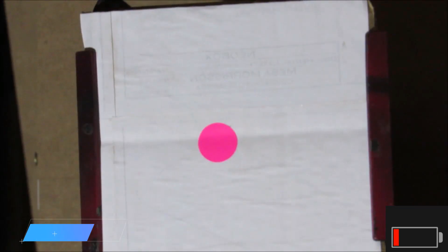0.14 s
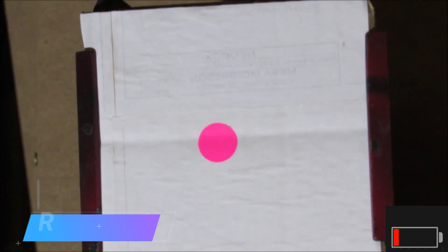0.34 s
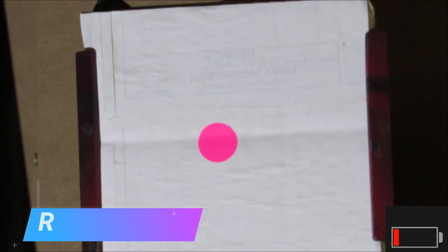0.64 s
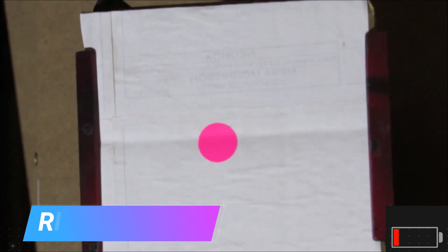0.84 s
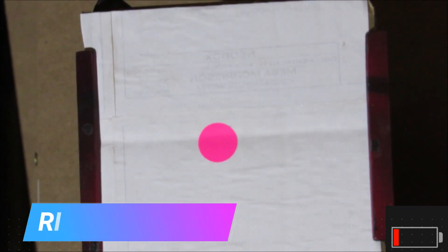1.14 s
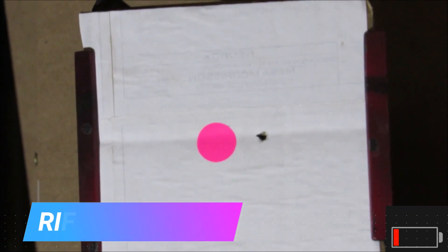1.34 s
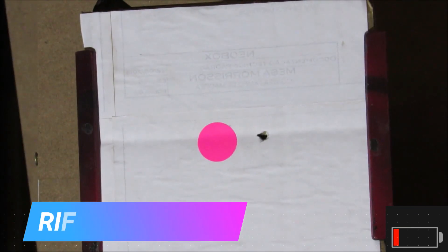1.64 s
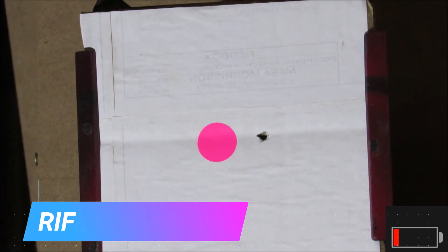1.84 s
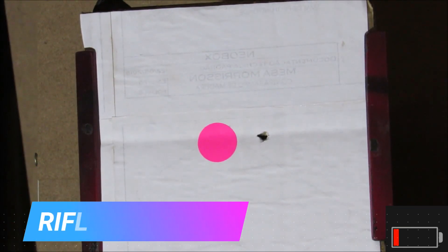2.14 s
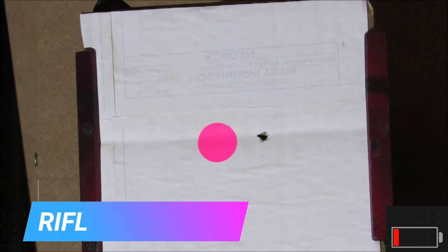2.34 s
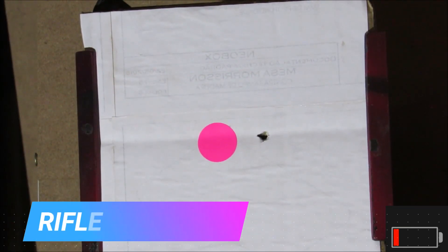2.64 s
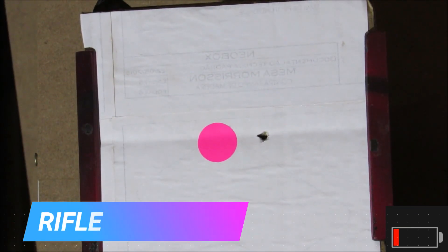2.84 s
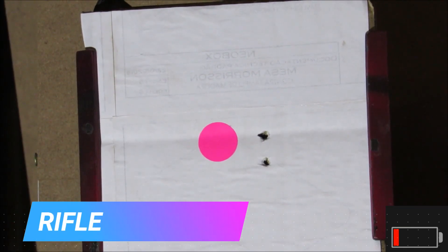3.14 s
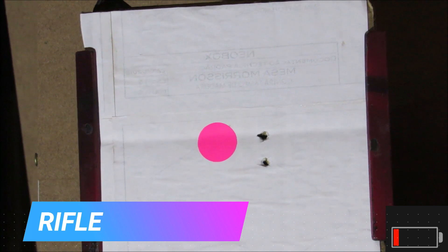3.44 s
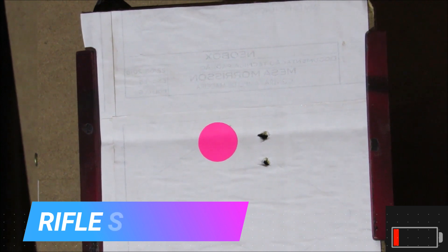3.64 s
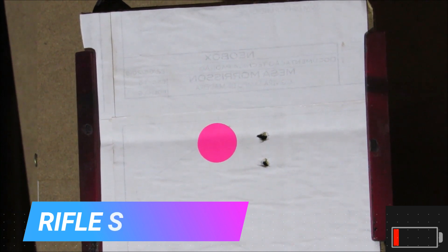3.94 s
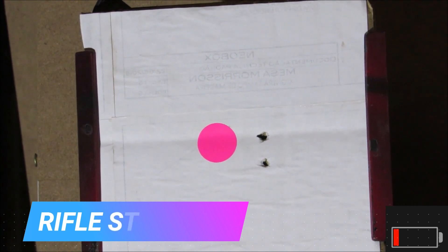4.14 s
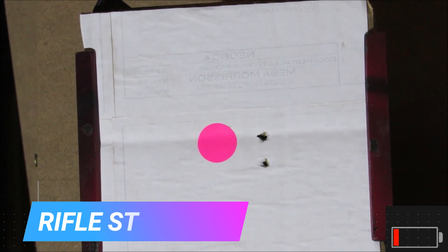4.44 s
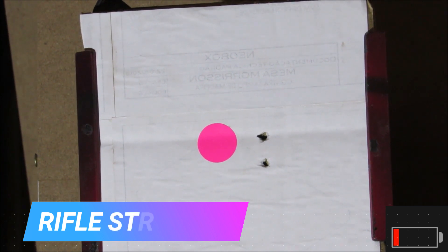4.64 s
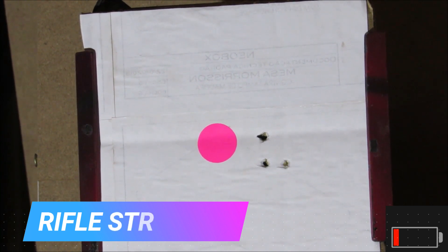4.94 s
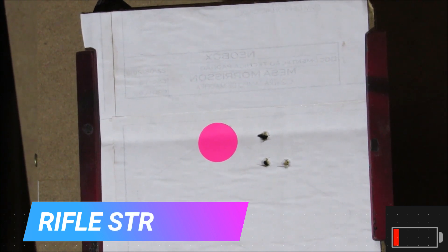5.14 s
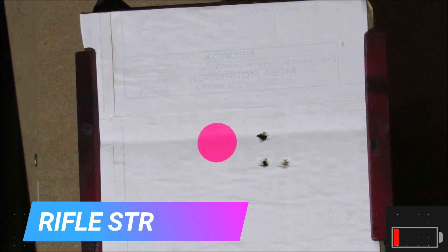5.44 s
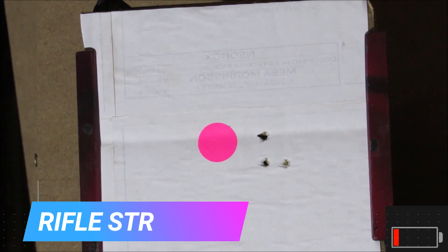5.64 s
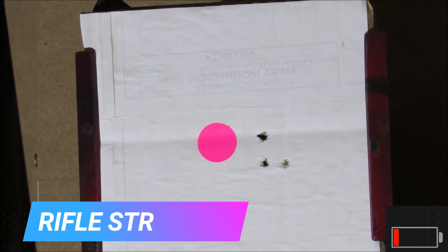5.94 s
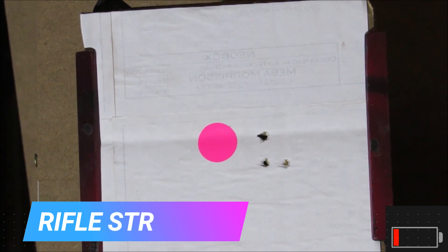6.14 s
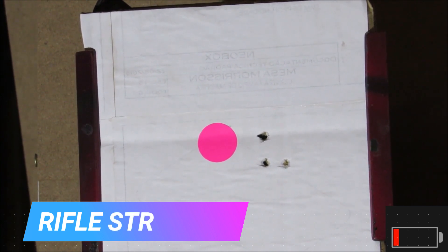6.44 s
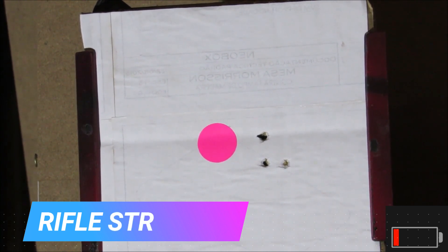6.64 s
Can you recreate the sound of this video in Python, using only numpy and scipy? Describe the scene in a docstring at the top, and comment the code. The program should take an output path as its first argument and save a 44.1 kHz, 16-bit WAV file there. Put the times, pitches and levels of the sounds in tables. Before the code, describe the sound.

Heard in stereo from beside the target in an indoor range, three air rifle shots land at a steady pace. Each is a distant pop, a split-second hiss of the passing pellet and a loud crack through card, with a ringing steel tail and an echo. The low ventilation hum drops away at every shot and then returns. Two quick ticks come between the last shots, and near the end the rifle knocks softly far away.

```python
"""Ventilation rumbles and hums in a long, echoing range; a stereo pair stands beside the paper target.
Three air rifle shots come from the far end. Each time the muzzle pop arrives first, then the pellet
rushes past the microphones, punches the card and rings the steel trap. The background level ducks at
each shot, creeps up, then jumps back, the last time with a faint click. Two small ticks follow the
second shot; after the third, the rifle is handled far away."""
import sys
import numpy as np
from scipy import signal
from scipy.fft import rfft, irfft, next_fast_len
from scipy.io import wavfile
from scipy.ndimage import map_coordinates

SR = 44100
rng = np.random.default_rng(int(sys.argv[2]) if len(sys.argv) > 2 else 0)


def inscribe(sig):
    """Save sig as 16-bit PCM at rate SR to the path in sys.argv[1].

    A 1-D sig is mono; a 2-D sig holds one channel per row.
    Samples are clipped to [-1, 1] before scaling.
    """
    pcm = np.round(np.clip(np.atleast_2d(sig).T, -1, 1) * 32767)
    wavfile.write(sys.argv[1], SR, pcm.astype(np.int16))


N = 299880
T = np.arange(2 * SR) / SR  # seconds since an event
PASS_S = .0115  # the pellet passes the microphones this long before it meets the card

# shots at the target end: pop t/s, lag to card/s, card/dB, smack/dB, top trap modes/dB, ping f/Hz, ping/dB
SHOTS = [(1.2147, .0648, -11, -7, 0.5, 13000, -30), (2.8757, 0.064, -10, -16.5, -10.5, 8650, -22),
         (4.9050, .0602, -10, -9.5, -11.5, 8620, -22.5)]
# the pop's ways to the microphones (direct, off the floor, off a wall): delay/s, level/dB
POP_PATHS = [(0, -4), (.00128, 1), (.008, -6)]
# spectra of the far pop and of its wash of reflections: f/Hz, level/dB
POP_SPECTRUM = [(200, -32.5), (900, -22.5), (1500, -7.5), (2500, -14), (5000, -3.5), (7500, 0.5),
                (11000, -6.5), (15500, -24)]
WASH_SPECTRUM = [(180, -35), (300, -14.5), (485, -10), (643, -13.5), (853, -1.5), (1380, -2.5),
                 (2720, -8.5), (5840, -3.5), (9930, -5.5), (15800, -18.5)]
def muzzle(pop_db=2.0, spit_db=-18, wash_db=-25.5, wash_t60=3.0, hush_db=-9, late_t60=0.53):
    """From the far end, a sharp pop by three paths, then reflections that sink as the pellet passes."""
    out, t = np.zeros((2, N)), T[:SR // 4]
    floor_delay = POP_PATHS[1][0]
    for s, lag, *_ in SHOTS:
        for delay, path_db in POP_PATHS:
            add(out, s + delay, -amp(pop_db + path_db) * click(POP_SPECTRUM))
        add(out, s + floor_delay, amp(spit_db) * burst(POP_SPECTRUM, rise=0.00023, t60=0.009))
        since_pass = np.maximum(t - (lag - PASS_S), 0)
        sink_db = hush_db * np.minimum(since_pass / 0.0096, 1) - 60 * since_pass / late_t60
        envelope = amp(wash_db + sink_db - 60 * t / wash_t60) * np.minimum(t / 0.0074, 1)
        add(out, s, envelope * noise(WASH_SPECTRUM, len(t), NEAR_LIKENESS))
    return out


# spectrum of the pellet's rush, close by: f/Hz, level/dB
RUSH_SPECTRUM = [(150, -20.5), (500, -2), (1000, -6.5), (2500, -2.5), (5000, -4.5), (8000, 8.5),
                 (12000, 7.5), (15500, 1)]
def pellet_flight(rush_db=-11.0, swell_s=.003, fade_s=0.00093, hold_s=0.00086,
                  push=0.16, push_width_s=0.00054, push_delay_s=0.0013):
    """Hiss piles up ahead of the pellet; passing the microphones, it pushes air and leaves a suction."""
    out, lead_s = np.zeros((2, N)), .03
    t = T[:SR // 16] - lead_s  # zero as it passes
    nearness = np.exp(np.minimum(t + hold_s, 0) / swell_s - np.maximum(t, 0) / fade_s)
    u = (t - push_delay_s) / push_width_s
    pressure = -2 * u * np.exp(-u * u / 2) * np.where(u < 0, .8, .45)  # the suction is the weaker half
    for s, lag, *_ in SHOTS:
        rush = amp(rush_db) * nearness * crackle(RUSH_SPECTRUM, len(t), rough_db=2.5)
        add(out, s + lag - PASS_S - lead_s, rush + push * pressure)
    return out


# spectra of the card's snap and flap, the strike on the trap and the range's echo: f/Hz, level/dB
SNAP_SPECTRUM = [(100, -11), (600, -4.5), (1500, -4), (2400, -5), (4500, -2), (8000, -8), (12000, -12.5),
                 (15500, -13)]
FLAP_SPECTRUM = [(50, -22), (200, -2), (450, 5.5), (800, -9), (1500, -11.5), (3500, -3), (8200, 3),
                 (10500, -2.5), (15500, -17.5)]
TRAP_SPECTRUM = [(100, -28), (450, -4.5), (700, -22), (1000, -4), (2300, -10.5), (4000, -9.5), (7000, -1.5),
                 (8700, 0.5), (9800, -8), (15500, -21)]
RANGE_SPECTRUM = [(88, -55.5), (150, -24), (169, -15.5), (209, -9.5), (291, -7), (354, -10), (438, 2.5),
                  (543, -8), (622, -7.5), (699, -11), (1010, -4.5), (2430, -14), (8640, -5), (15800, -20.5)]
# modes of the target box and the steel trap: f/Hz, level/dB, t60/s
BOX_MODES = [(308.3, -0.5, 0.065), (442, -6.5, 0.21), (1015, -7, 0.21)]
TRAP_MODES = [(2760, -21, 1), (3284, -18.5, 1.1), (4210, -10.5, 1.6), (4325, -10.5, 1.5), (4820, -6, 1.1),
              (5520, -8, 1.3), (5640, -6, 1.5), (5750, -2, 1), (6130, -7.5, 1.2), (6060, -8.5, 1.8),
              (6640, -8, 1.5), (7200, -2.5, 1.1), (7340, -3, 1.1), (7550, -3, 1.1), (7985, -5, 0.98),
              (8700, -2, .6), (8590, -1.5, .5), (8560, -3.5, 1.1), (8700, -4.5, 1.1), (9380, -6.5, 0.56),
              (11230, -10, 0.58), (12110, -9.5, .6), (12900, -6.5, .6), (13020, -9.5, .6)]
def target_hit(snap_db=3, smack_hz=2850, smack_t60=0.0085, strike_db=-7, trap_delay_s=.0113,
               trap_db=-15.0, rattle_db=-28, box_db=-24, ring_db=-41.0, range_db=-34, ping_t60=.06):
    """Beside the microphones the pellet snaps through the card, then rings and rattles the steel trap."""
    out = np.zeros((2, N))
    smack = np.sin(2 * np.pi * smack_hz * T) * amp(-60 * T / smack_t60)
    for pop_s, lag, card_db, smack_db, high_db, ping_hz, ping_db in SHOTS:
        card_s = pop_s + lag
        trap_s = card_s + trap_delay_s
        add(out, card_s, amp(snap_db) * click(SNAP_SPECTRUM))
        add(out, card_s, amp(smack_db) * smack)
        add(out, card_s, amp(card_db) * burst(FLAP_SPECTRUM, rise=0.0022, t60=0.032))
        add(out, trap_s, amp(strike_db) * click(TRAP_SPECTRUM))
        add(out, trap_s, amp(trap_db) * burst(TRAP_SPECTRUM, rise=0.001, t60=0.068))
        add(out, trap_s, amp(rattle_db) * burst(TRAP_SPECTRUM, rise=0.0089, t60=0.36))
        add(out, trap_s, ringing([(ping_hz, ping_db, ping_t60)], spread_hz=50, count=5))
        add(out, card_s, amp(box_db) * ringing(BOX_MODES, spread_hz=66, count=4))
        add(out, trap_s, amp(ring_db) * ringing(TRAP_MODES, high_db, spread_hz=27, count=9))
        add(out, card_s, amp(range_db) * range_echo(RANGE_SPECTRUM))
    return out


# reverberation down the range: f/Hz, t60/s
RANGE_DECAY = [(150, 1.8), (450, 2.1), (1200, 3.04), (3000, 2.3), (5500, 1.59), (8000, 1.23), (10500, 0.84),
               (15000, .6)]
def range_echo(spectrum):
    """The long range answers from all around the microphones; the treble dies first."""
    hz, t, bands = signal.stft(noise(spectrum, len(T), ripple_db=1.5), SR, nperseg=512)
    decay = amp(-60 * t / along(RANGE_DECAY, hz)[:, None])
    return signal.istft(bands * decay, SR, nperseg=512)[1]


# knocks at the far end: t/s, level/dB, brightness/(dB per octave), ring against the knock/dB
KNOCKS = [(5.834, -27.5, -3, -19.5), (5.8462, -30, 2.5, -30), (6.189, -23.5, -2, -28),
          (6.2038, -28, 8.5, -25)]
# spectrum of a knock: f/Hz, level/dB
KNOCK_SPECTRUM = [(300, -3), (700, -2.5), (1300, 4.5), (2200, 1.5), (3000, -2), (5000, -4), (9000, -17),
                  (15000, -48)]
# modes of the rifle's action: f/Hz, level/dB, t60/s
ACTION_MODES = [(1307, 4.5, 0.28), (1880, -4, 0.16), (2270, 4.5, 0.14), (3260, 2, 0.21), (3940, -8, .4),
                (4280, -9, .55), (5200, -12, .45), (7600, -20, .3)]
def rifle_handling(snap_db=-2, knock_db=-9, echo_db=-24):
    """Far from the microphones, knocks ring the rifle's action and echo."""
    out = np.zeros((2, N))
    for s, db, brightness, ring_db in KNOCKS:
        colour = [(hz, level + brightness * np.log2(hz)) for hz, level in KNOCK_SPECTRUM]
        add(out, s, amp(db + snap_db) * click(colour))
        add(out, s, amp(db + knock_db) * burst(colour, rise=0.00089, t60=0.033))
        add(out, s, amp(db + ring_db) * ringing(ACTION_MODES, spread_hz=29.4, count=6))
        add(out, s, amp(db + echo_db - 38 * T) * range_echo(colour)[:, :len(T)])
    return out


# small sharp ticks: t/s, level/dB
TICKS = [(3.6231, -30.5), (3.637, -31), (6.6736, -43)]
# their spectrum: f/Hz, level/dB
TICK_SPECTRUM = [(1000, -4), (4000, -12), (7500, 1), (10000, -14), (15500, -27)]
def ticks(tick_db=-5, tail_db=-29):
    """Two quick ticks; later, a faint click as the background jumps back to full level."""
    out = np.zeros((2, N))
    for s, db in TICKS:
        add(out, s, amp(db + tick_db) * burst(TICK_SPECTRUM, rise=0.00048, t60=0.0034))
        add(out, s, amp(db + tail_db) * burst(TICK_SPECTRUM, rise=0.0053, t60=0.49))
    return out


# spectra of the duct rumble and air hiss: f/Hz, level/dB
DUCT_SPECTRUM = [(15, -45.5), (25, -18), (48, -10.5), (86, -16.5), (108, -3.5), (146, -4.5), (187, -0.5),
                 (260, -4.5), (398, -6.5), (444, -11), (545, -11.5), (660, -21), (860, -56), (1450, -120)]
AIR_SPECTRUM = [(450, -36), (760, -3), (863, -2), (1130, -1), (1360, -7), (2670, -18.5), (4220, -26),
                (10300, -34), (15800, -42.5)]
# fan and mains hum, and the fan motor's faint whine: f/Hz, level/dB
HUM_TONES = [(59.2, -46), (118.4, -46), (193.8, -47.5), (382.2, -47.5), (414.5, -47.5)]
WHINE_TONES = [(1098, -60.5), (2363, -70)]
def ventilation(rumble_db=-35.5, hum_db=-1.54, waver=.5):
    """Room tone: duct rumble and air hiss from all around, with slightly unsteady fan tones."""
    t = np.arange(N) / SR
    dip_db, hiss_db = background_duck()
    rumble = amp(rumble_db + 0.37 * wobble(4.9, N)) * noise(DUCT_SPECTRUM, N)
    hiss = amp(hiss_db) * noise(AIR_SPECTRUM, N)
    hum = np.zeros(N)
    for hz, db in [*HUM_TONES, *WHINE_TONES]:
        gain = amp(db + 0.77 * wobble(3.3, N))
        drift = waver * np.sqrt(hz / 100) * wobble(6, N)  # higher tones wander further in phase
        hum += gain * np.sin(2 * np.pi * hz * t + drift)
    return amp(dip_db) * (rumble + hiss + amp(hum_db) * np.sqrt(2) * hum)


# stretches of full background level, each until the next shot: start t/s, hiss level/dB
FULL_STRETCHES = [(0, -44.5), (1.968, -46.5), (3.97, -47), (6.674, -47)]
def background_duck(pop_dip_db=-5, low_db=-21, fall_s=0.0053, hold_s=0.25,
                    creep_to_db=-7.5, creep_s=0.54, return_s=0.0054):
    """Dip and hiss in dB: the background level ducks at each shot, creeps up, then jumps back."""
    t = np.arange(N) / SR
    dip_db, hiss_db = np.zeros(N), np.zeros(N)
    for start, db in FULL_STRETCHES:
        hiss_db[t >= start] = db
    for (s, lag, *_), (dip_end, _) in zip(SHOTS, FULL_STRETCHES[1:]):
        since_pass = t - (s + lag - PASS_S)
        popped = np.clip((t - s) / fall_s, 0, 1)
        passed = np.clip(since_pass / fall_s + .5, 0, 1)
        creep = 1 - np.exp(-np.maximum(since_pass - hold_s, 0) / creep_s)
        lasting = np.clip((dip_end - t) / return_s + .5, 0, 1)
        depth_db = low_db + creep * (creep_to_db - low_db)
        dip_db += (popped - passed) * pop_dip_db + passed * lasting * depth_db
    return dip_db, hiss_db


def ringing(modes, high_db=0, spread_hz=22, count=3):
    """Each mode is a cluster of close partials that beat, with new strengths at every hit."""
    t = T[:5 * SR // 4]
    ring = np.zeros((2, len(t)))
    for hz, db, t60 in modes:
        level_db = db + high_db * (hz > 10000) + rng.normal(0, 1, (2, 1))
        pitches = hz + spread_hz * np.sqrt(hz / 5000) * rng.normal(size=(count, 1))
        partials = np.sin(2 * np.pi * (pitches * t + rng.random((count, 1))))
        ring += amp(level_db) * amp(-60 * t / t60) * partials.sum(0) / np.sqrt(count)
    return ring


def click(spectrum, size=1024):
    """The most compact causal pulse with this spectrum, peak 1."""
    magnitude = amp(along(spectrum, np.fft.rfftfreq(size, 1 / SR)))
    cepstrum = irfft(np.log(magnitude))
    causal = 2 * cepstrum[:size // 2] * (np.arange(size // 2) > 0)
    pulse = irfft(np.exp(rfft(causal, size)))
    return pulse / np.abs(pulse).max()


def burst(spectrum, rise, t60):
    """A crackle that swells for rise seconds and then dies away."""
    t = T[:SR // 2]
    envelope = np.minimum(t / rise, 1) * amp(-60 * np.maximum(t - rise, 0) / t60)
    return envelope * crackle(spectrum, len(t), rough_db=1.5)


# how alike the two microphones hear near sound: f/Hz, likeness/(0 to 1)
NEAR_LIKENESS = [(60, .85), (600, 0.92), (1400, 0.94), (2800, 1), (5000, .94), (8000, 0.68), (11000, 0.56),
                 (15000, 0.52)]
def crackle(spectrum, size, rough_db=3, rate=1800):
    """Near noise that comes in tiny uneven cracks."""
    return unit(noise(spectrum, size, NEAR_LIKENESS) * amp(rough_db * wobble(rate, size)))


# how alike they hear sound from all around: f/Hz, likeness/(0 to 1)
DIFFUSE_LIKENESS = [(60, .76), (300, .78), (650, 0.74), (1400, 0.87), (2600, .96), (4500, .82),
                    (7000, 0.49), (11000, 0.19), (15000, .05)]
def noise(spectrum, size, likeness=DIFFUSE_LIKENESS, ripple_db=0, ripple_hz=55):
    """Coloured stereo noise of rms 1; standing waves can ripple its spectrum."""
    def colour(hz):
        width = np.arccos(np.clip(along(likeness, hz), 0, 1)) / 2
        ripple = ripple_db * map_coordinates(rng.standard_normal(SR // 10), [hz / ripple_hz])
        return amp(along(spectrum, hz) + ripple) * [np.cos(width), np.sin(width)]
    mid, side = filtered(rng.standard_normal((2, size)), colour)
    return unit(np.array([mid + side, mid - side]))


def amp(db):
    """Decibels to gain."""
    return 10 ** (np.asarray(db) / 20)


def unit(x):
    """Scaled to rms 1."""
    return x / np.sqrt(np.mean(x ** 2) + 1e-20)


def along(points, hz):
    """(Hz, value) points read on a log axis."""
    f, values = np.transpose(points)
    return np.interp(np.log(hz + 1), np.log(f), values)


def wobble(rate, size):
    """A smooth random curve, rate knots a second."""
    knots = rng.standard_normal(int(size * rate / SR) + 4)
    return map_coordinates(knots, [np.arange(size) * rate / SR])


def filtered(x, response):
    """x shaped by a response of frequency."""
    padded = next_fast_len(x.shape[-1] + 8192)
    return irfft(rfft(x, padded) * response(np.fft.rfftfreq(padded, 1 / SR)), padded)[..., :x.shape[-1]]


def add(out, s, sound):
    """Mix a sound in at time s."""
    start = round(s * SR)
    out[:, start:start + sound.shape[-1]] += sound[..., :N - start]


def scene():
    """Shots, far handling, ticks and room tone, heard at the target end."""
    return muzzle() + pellet_flight() + target_hit() + rifle_handling() + ticks() + ventilation()


# balance of the microphone pair: f/Hz, left minus right/dB
MIC_BALANCE = [(60, -6), (200, -4.5), (380, -4), (700, -0.5), (1300, 0.5), (8000, -0.5), (15000, 1.5)]
def record(dry, ceiling=1.1, notch_hz=695, notch_width_hz=130, notch_depth=0.65, top_hz=15900):
    """The microphones have a narrow hollow, the right one hears more bass, and peaks overload."""
    def microphones(hz):
        damping = 1j * hz * notch_width_hz
        hollow = 1 - notch_depth * damping / (notch_hz ** 2 - hz ** 2 + damping)
        return hollow * amp(np.outer([.5, -.5], along(MIC_BALANCE, hz)))
    heard = filtered(dry, microphones)
    overloaded = heard / (1 + np.abs(heard / ceiling) ** 6) ** (1 / 6)
    return filtered(overloaded, lambda hz: 1 / (1 + (hz / top_hz) ** 120))  # steep band limit


dry = scene()
out = record(dry)
inscribe(out)
```